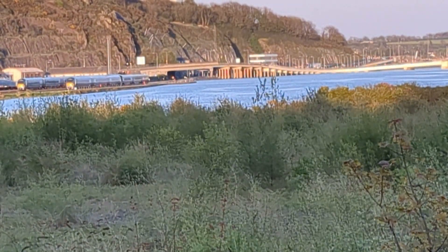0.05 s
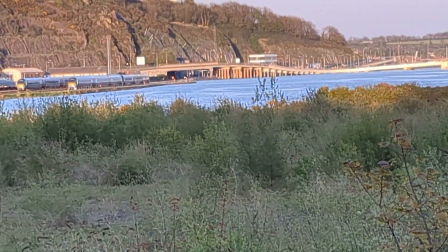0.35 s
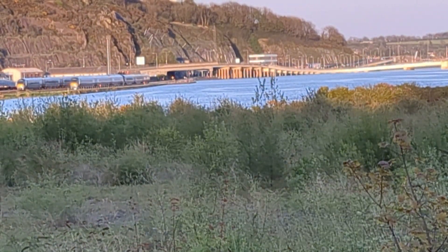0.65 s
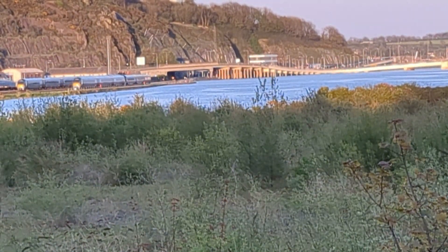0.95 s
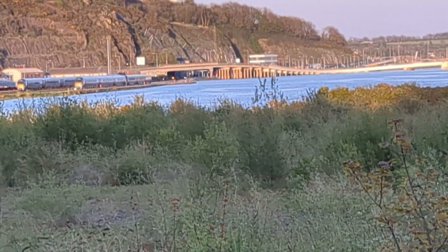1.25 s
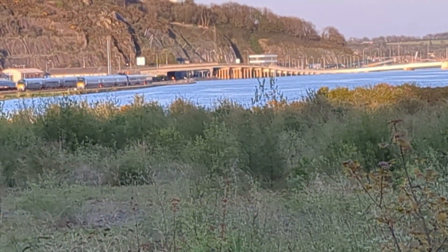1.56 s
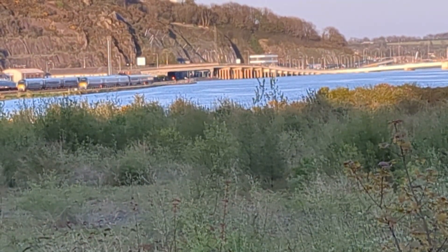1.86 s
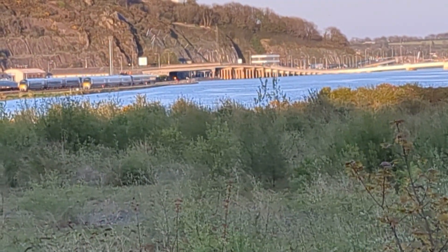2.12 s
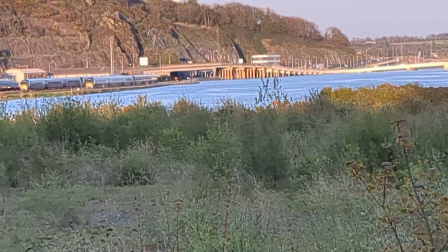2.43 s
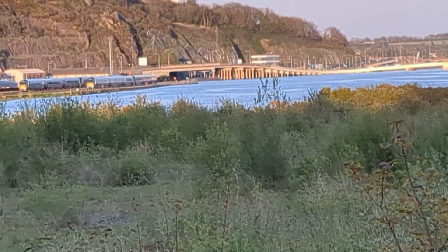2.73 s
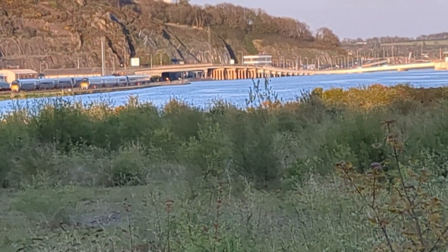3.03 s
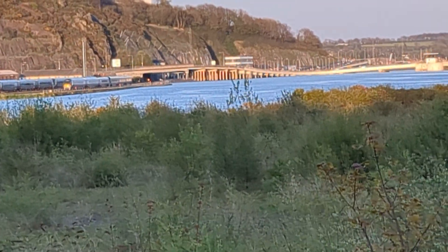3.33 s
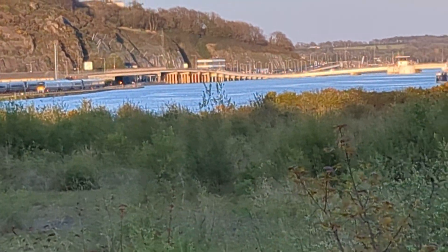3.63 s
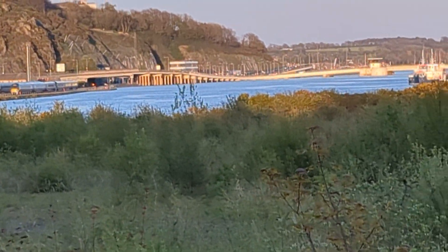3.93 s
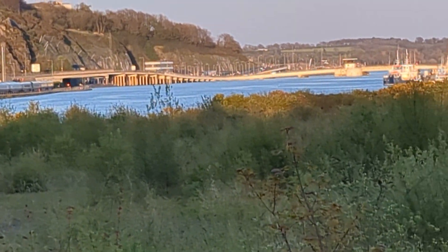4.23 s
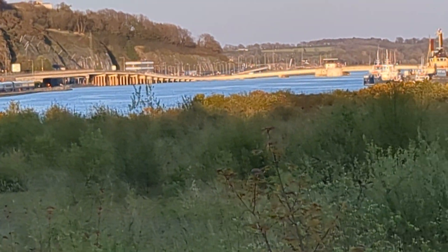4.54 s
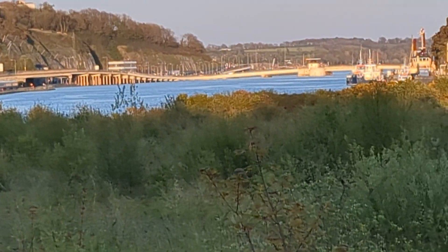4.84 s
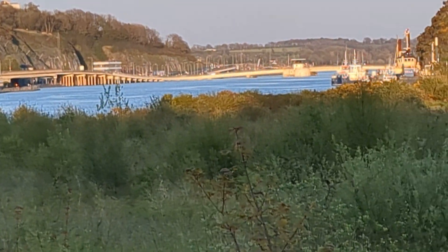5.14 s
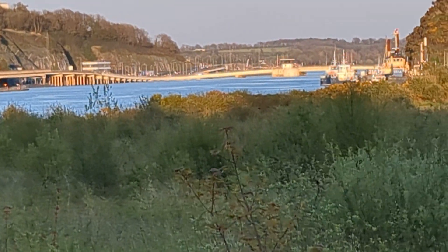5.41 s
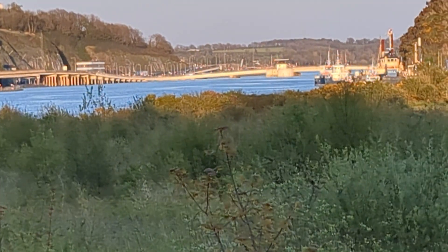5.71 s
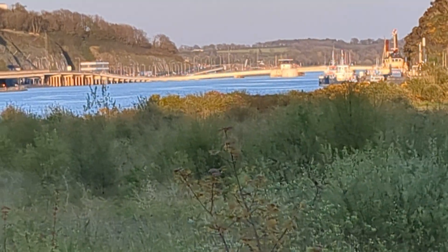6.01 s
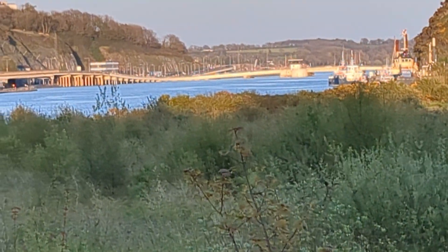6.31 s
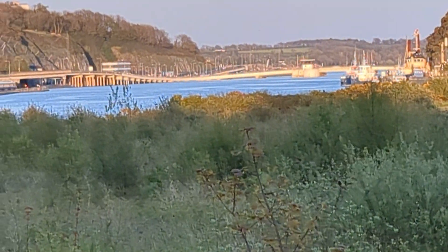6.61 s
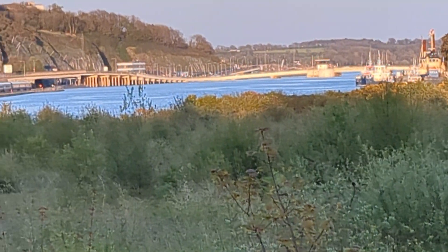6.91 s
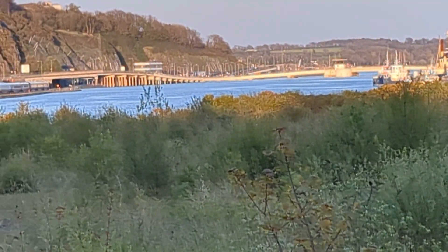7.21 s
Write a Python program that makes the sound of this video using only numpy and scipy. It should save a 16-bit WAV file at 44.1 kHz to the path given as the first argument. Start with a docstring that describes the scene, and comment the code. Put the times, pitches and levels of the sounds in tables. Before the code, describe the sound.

A small songbird sings a quick falling song, then rising whistles repeat over light wind on the microphone and distant traffic.

```python
"""A finch sings a falling song of lisps, a rattle, a snap and a flourish in scrub above a river.
A warbler repeats an upslurred whistle and small birds twitter far off; each voice is a nearly pure
oscillation of the syrinx, scattered by twigs and bushes. Turbulent wind presses on two microphone
ports, mostly the left one, while traffic hums across the water over a faint hiss.
A noise suppressor holds the treble down and raises it while a high note is loud."""
import sys
import numpy as np
from scipy import signal
from scipy.fft import rfft, irfft
from scipy.io import wavfile
from scipy.ndimage import uniform_filter1d

SR = 44100
rng = np.random.default_rng(int(sys.argv[2]) if len(sys.argv) > 2 else 0)


def file_out(sig):
    """Save sig as 16-bit WAV at sys.argv[1]."""
    # one column per channel
    cols = np.atleast_2d(sig).T
    # limit, then scale
    lim = np.clip(cols, -1, 1)
    pcm = np.round(lim * 32767).astype(np.int16)
    wavfile.write(sys.argv[1], SR, pcm)


N = 324576
TIME = np.arange(N) / SR

# All table levels are relative; a lean is the level at the left port minus that at the right.
# Notes of each finch syllable: t/s from its beat, length/s, start f/Hz, end f/Hz, arch/Hz,
# level/dB, buzz depth/Hz
LISP_NOTES = [(-.064, .026, 4180, 4020, 0, -9, 0), (-.051, .017, 2820, 2920, -30, -20, 0),
              (-.04, .021, 2850, 5000, 0, -11, 0), (-.013, .023, 3550, 2500, 600, -3, 0)]
RATTLE_NOTES = [(-.018, 0.014, 2750, 2800, 81, -15, 3), (-.003, 0.0344, 2996, 3532, 333, 3, 365),
                (.036, .026, 2218, 1854, 568, -5.5, 8), (.062, 0.033, 2440, 2420, 200, -27, -1)]
SNAP_NOTES = [(-.014, .027, 3540, 3050, 250, 4.5, 347), (.006, 0.025, 3010, 840, 0, 2, 249)]
FLOURISH_NOTES = [(-.061, 0.024, 3900, 5450, -350, -10, 200), (-.041, .03, 3030, 3330, 97, -9.5, 250),
                  (-.03, .085, 3212, 2800, 560, -3.5, 424), (.035, .095, 2840, 1924, -100, -15, 330)]
# Beats on which each syllable is sung: t/s, level/dB
LISP_BEATS = [(0.111, -57.5), (0.237, -56.5), (.357, -56.5), (.474, -51), (.593, -48.5), (0.705, -47.5),
              (.826, -49)]
RATTLE_BEATS = [(0.892, -61), (1.003, -58.5), (1.115, -58), (1.227, -59), (1.334, -59), (1.443, -56.5),
                (1.558, -58)]
SNAP_BEATS = [(1.681, -64)]
FLOURISH_BEATS = [(1.825, -52)]
# Warbler whistles: t/s, length/s, level/dB, start f/Hz, end f/Hz, shoulder height/Hz
WARBLER_WHISTLES = [(.545, .13, -58.5, 2900, 4450, 120), (2.15, .11, -83, 2850, 4050, 50),
                    (2.56, .142, -62, 2750, 4850, 0), (3.14, .11, -84, 2950, 3950, 50),
                    (3.405, .147, -61, 2800, 4350, 300), (4.29, .162, -59, 2700, 4350, 280),
                    (5.26, .155, -53, 2650, 4750, 0), (6.05, .11, -81, 2900, 3950, 50),
                    (6.2, .157, -58, 2780, 4300, 130), (7.18, .155, -53, 2700, 4850, 0)]
# Envelope of a whistle: fraction of its length, level/dB
WHISTLE_ENVELOPE = [(0, -34), (.35, -20), (.7, -5), (.87, -3.5), (1, -13)]
# Notes of distant birds: t/s, length/s, start f/Hz, end f/Hz, level/dB
FAR_NOTES = [(.443, .024, 4620, 4800, -65), (.558, .022, 4700, 4700, -61), (2.85, .09, 5150, 4700, -82),
             (2.925, .085, 4620, 4600, -83), (1.82, .07, 11400, 11200, -86), (1.84, .06, 7700, 7400, -86),
             (2.08, .38, 7300, 6000, -96), (2.68, .15, 6900, 5700, -92), (5.7, .04, 4400, 6000, -77),
             (5.853, .03, 4850, 5450, -79), (5.89, .022, 3600, 4200, -79), (6.03, .03, 4750, 5300, -80)]
# Eddies striking the ports: t/s, level/dB, half-length/s, roll-off f/Hz, lean/dB
PORT_EDDIES = [(0.004, -35.5, .008, 174, 23), (0.255, -46, 0.0029, 500, 31), (.381, -52.5, 0.0032, 158, 8),
               (0.407, -46.5, 0.0044, 217, 28), (.586, -39.5, 0.005, 210, 38), (.683, -38, 0.0074, 205, 16),
               (0.704, -31.5, 0.0092, 365, 39), (0.78, -44.5, 0.006, 127, 15),
               (0.874, -39.5, 0.014, 196, 23), (1.04, -36.5, 0.012, 370, 28), (1.064, -29, 0.0052, 335, 45),
               (1.211, -43.5, 0.005, 500, 34), (1.248, -42, .018, 470, 30), (1.456, -41, 0.013, 209, 18),
               (1.489, -44.5, 0.0065, 260, 29), (1.521, -45, 0.01, 310, 32), (1.571, -46, 0.016, 254, 24),
               (1.673, -44.5, .009, 250, -14), (1.722, -45, 0.037, 193, -5),
               (1.998, -46.5, 0.023, 217, -5.5), (2.042, -44, 0.039, 224, -4.5),
               (2.478, -45.5, 0.034, 245, 9.5), (2.591, -44.5, 0.0085, 131, 27),
               (2.68, -51.5, 0.0035, 433, 30), (3.163, -53.5, 0.0031, 101, 35),
               (3.544, -56.5, 0.0037, 91, -2.5), (3.751, -57.5, .03, 90, 2.5),
               (3.879, -52, 0.0049, 145, 16), (3.975, -49.5, .001, 417, 36),
               (4.598, -51.5, 0.0089, 103, 15), (4.688, -52, 0.00076, 600, 40),
               (4.788, -44, 0.0087, 229, 30), (4.924, -45, 0.019, 237, 21), (5.086, -58, 0.0027, 105, -4),
               (5.423, -47.5, 0.026, 165, 20), (5.686, -53, 0.0042, 132, 24), (6.104, -54, 0.0052, 207, 18),
               (6.538, -56.5, 0.0022, 120, 23)]
# Slow course of the breeze: t/s, level/dB, lean/dB before scaling
BREEZE_LEVELS = [(0.04, -53, 17), (0.22, -60, 16), (0.79, -51, 16), (0.96, -67, -15.5), (1.14, -49, 28.5),
                 (1.4, -50, 12), (1.61, -52.5, 13), (1.67, -71, -6), (1.91, -48.5, 14.5), (2.12, -63, -6),
                 (2.42, -58, 14), (3.48, -67.5, -1), (4.95, -60.5, 18), (5.11, -66, 0), (5.4, -65.5, 10),
                 (6.56, -59, 14), (7.32, -67.5, 10), (7.36, -55.5, -17)]
# Slow course of the traffic: t/s, low-band level/dB, high-band level/dB
TRAFFIC_LEVELS = [(0.0, -64.5, -81), (0.59, -66, -68), (1.74, -65, -79), (2.97, -68.5, -80),
                  (3.34, -70.5, -77), (3.85, -66.5, -81), (4.26, -69.5, -77.5), (4.59, -67, -78.5),
                  (4.86, -68.5, -81), (5.2, -68, -80.5), (5.47, -67, -73), (6.01, -67, -79),
                  (6.46, -64.5, -76.5), (6.64, -67.5, -81), (6.87, -66.5, -79.5), (7.07, -67.5, -77.5),
                  (7.36, -60.5, -80)]
# Spectral densities of the three noises: f/Hz, level/dB
BREEZE_SPECTRUM = [(15, -29), (25, -24), (33, -8), (46, -7.5), (65, 2), (100, -5), (140, -6.5), (220, -24),
                   (450, -36), (800, -40), (1500, -106)]
TRAFFIC_SPECTRUM = [(200, -20.5), (400, -18.5), (560, -10.5), (750, -2), (1000, -1.5), (1350, -2),
                    (1700, -4.5), (1950, -8), (2200, -16), (2600, -26), (3500, -34)]
HISS_SPECTRUM = [(1500, -4), (2600, -2), (3300, 0), (4100, 1), (4700, -3), (6500, -3), (7600, -7),
                 (12000, -8), (13500, -12), (16000, -13)]


def finch(lean_db=-.5):
    """Superposition of quick notes forms four kinds of syllable; each note varies in level."""
    song = np.zeros((2, N))
    for notes, beats in ((LISP_NOTES, LISP_BEATS), (RATTLE_NOTES, RATTLE_BEATS),
                         (SNAP_NOTES, SNAP_BEATS), (FLOURISH_NOTES, FLOURISH_BEATS)):
        for beat, db in beats:
            for delay, *shape in notes:
                add(song, beat + delay, amp(db + rng.uniform(-1.5, 4.5)) * finch_note(*shape))
    return scrub(song * sides(lean_db), lag_ms=.36, near_db=-7, near_t60=.1, far_db=-10.5, far_t60=.8)


def finch_note(length, from_hz, to_hz, arch_hz, db, depth_hz, buzz_hz=218, pitch_spread=.012):
    """Frequency and amplitude modulation at one rate give an arched glide sidebands, heard as buzz."""
    t = np.arange(0, length, 1 / SR)
    progress = t / length
    flutter = 2 * np.pi * buzz_hz * t * rng.uniform(.93, 1.03)
    throb = 1 + np.clip(.27 * depth_hz / 400, 0, 1) * np.cos(flutter)
    glide = from_hz + (to_hz - from_hz) * progress + arch_hz * (1 - (2 * progress - 1) ** 2)
    hz = glide * (1 + pitch_spread * rng.standard_normal()) + depth_hz * np.sin(flutter)
    envelope = abs(np.sin(np.pi * progress)) ** 1.4
    return throb * envelope * syrinx(hz, db)


def syrinx(hz, db, octave_db=-48):
    """A nearly sinusoidal oscillator: phase is the integral of frequency, with a weak second harmonic."""
    phase = 2 * np.pi * np.cumsum(hz) / SR
    tone = np.sin(phase) + amp(octave_db) * np.sin(2 * phase)
    return np.sqrt(2) * amp(db) * tone * signal.windows.tukey(len(hz), .06)


def warbler(quaver=.01, shoulder_db_per_hz=.0288, lean_db=5.5):
    """A frequency sweep swells as it climbs, lingers on a shoulder, then flicks upward and stops."""
    song, waver = np.zeros((2, N)), wander(200)
    for start, length, db, from_hz, to_hz, shoulder_hz in WARBLER_WHISTLES:
        progress = np.linspace(0, 1, round(length * SR))
        rise = .6 * progress + .4 * progress ** 3.7  # steady climb plus late flick
        shoulder = shoulder_hz * np.exp(-((progress - .403) / .2) ** 2)
        glide = from_hz + (to_hz - from_hz) * rise + shoulder
        jitter = quaver * np.roll(waver, -round(start * SR))[:len(progress)]
        swell_db = db + curves(WHISTLE_ENVELOPE, progress)[0] + shoulder_db_per_hz * shoulder
        add(song, start, sides(lean_db) * syrinx(glide * (1 + jitter), swell_db))
    return scrub(song, lag_ms=-.24, near_db=-1, near_t60=.068, far_db=-6.5, far_t60=.42)


def far_birds():
    """Faint linear frequency sweeps are blurred by scattering in the bushes."""
    song = np.zeros((2, N))
    for start, length, from_hz, to_hz, db in FAR_NOTES:
        progress = np.linspace(0, 1, round(length * SR))
        add(song, start, np.sin(np.pi * progress) * syrinx(from_hz + (to_hz - from_hz) * progress, db))
    return scrub(song, lag_ms=-.5, near_db=-3, near_t60=.1, far_db=-12, far_t60=.5)


def scrub(song, lag_ms, near_db, near_t60, far_db, far_t60):
    """Scattering adds exponentially decaying echoes: brief from twigs, longer from farther bushes."""
    t = np.arange(SR) / SR
    near, far = rng.standard_normal((2, 2, SR)) * (rng.random((2, 2, SR)) < .08) * (t > .002)
    response = 0
    for echoes, db, t60 in ((near, near_db, near_t60), (far, far_db, far_t60)):
        tail = echoes * amp(-60 * t / t60)
        response = response + amp(db) * tail / np.linalg.norm(tail, axis=1, keepdims=True)
    direct = np.array([np.roll(song[0], round(lag_ms * SR / 1000)), song[1]])  # one port hears it first
    return direct + signal.fftconvolve(song, response, axes=1)[:, :N]


def buffets(turbulent_s=.0035, span_s=.013, gain_db=6.5):
    """An eddy is a pressure impulse within a burst of turbulence; in the shortest the impulse dominates."""
    wind, t = np.zeros((2, N)), np.arange(-4096, 4096) / SR
    for centre, db, half_length, edge_hz, lean_db in PORT_EDDIES:
        burst = rng.standard_normal((2, len(t))) * np.exp(-(t / half_length) ** 2)
        burst /= np.linalg.norm(burst, axis=1, keepdims=True)
        pressure = (t == 0) + half_length / turbulent_s * burst
        for corner_hz, kind in ((edge_hz, "low"), (2.02 * edge_hz, "low"), (.26 * edge_hz, "high")):
            pressure = signal.sosfilt(signal.butter(2, corner_hz, kind, fs=SR, output="sos"), pressure)
        pressure /= np.sqrt(np.sum(pressure ** 2, axis=1, keepdims=True) / (span_s * SR))
        add(wind, centre + t[0], amp(db + gain_db) * sides(lean_db) * pressure / np.sqrt(2))
    return wind


def breeze(lumpy_db=2, puffs_per_s=14, puff_db=-7, puff_band_hz=(55, 159.5)):
    """Turbulent pressure is local, so its low rumble and soft puffs are uncorrelated at the two ports."""
    lumps = unit(amp(lumpy_db * np.array([wander(23) for port in range(2)])))
    rumble = lumps * noise(BREEZE_SPECTRUM)
    impulses = rng.uniform(-1, 1, (2, N)) * (rng.random((2, N)) < puffs_per_s / SR)
    puffs = signal.sosfilt(signal.butter(2, puff_band_hz, "band", fs=SR, output="sos"), impulses)
    return wind_strength() * (rumble + amp(puff_db) * unit(puffs))


def wind_strength(breeze_gain_db=4, lean_scale=.87, gust_db=-7, gust_s=.048):
    """Incoherent powers add: the slow breeze plus a brief gust around every eddy."""
    db, lean_db = curves(BREEZE_LEVELS, TIME)
    power = (amp(db + breeze_gain_db) * sides(lean_scale * lean_db)) ** 2
    for centre, eddy_db, _, edge_hz, eddy_lean_db in PORT_EDDIES:
        gust = amp(eddy_db + gust_db) * (200 / edge_hz) ** 1.56  # duller eddies bring more wind
        power += (gust * sides(eddy_lean_db)) ** 2 * np.exp(-((TIME - centre) / gust_s) ** 2)
    return np.sqrt(power)


def traffic(coherent_share=.32, lag_ms=.56, split_hz=1500, gain_db=3, lean_db=-.9):
    """A diffuse field and a direct wave reaching the left port first form a partly coherent roar."""
    low_db, high_db = curves(TRAFFIC_LEVELS, TIME)
    left, right, road = noise(TRAFFIC_SPECTRUM, channels=3)
    direct = np.array([road, np.roll(road, round(lag_ms * SR / 1000))])
    roar = np.sqrt(1 - coherent_share) * np.array([left, right]) + np.sqrt(coherent_share) * direct
    low = signal.sosfiltfilt(signal.butter(4, split_hz, fs=SR, output="sos"), roar)
    return amp(gain_db) * sides(lean_db) * (amp(low_db) * unit(low) + amp(high_db) * unit(roar - low))


def noise(spectrum, channels=2):
    """Spectral shaping of white noise gives independent channels of one colour."""
    hz, db = np.transpose(spectrum)
    gain = amp(np.interp(np.log(np.fft.rfftfreq(N, 1 / SR) + 1), np.log(hz + 1), db))
    return unit(irfft(rfft(rng.standard_normal((channels, N))) * gain, N))


def wander(rate_hz):
    """Low-pass filtering of noise gives a smooth random fluctuation."""
    gain = np.exp(-(np.fft.rfftfreq(N, 1 / SR) / rate_hz) ** 2)
    return unit(irfft(rfft(rng.standard_normal(N)) * gain, N))


def amp(db):
    """Amplitude grows tenfold for every 20 dB."""
    return 10 ** (np.asarray(db) / 20)


def unit(x):
    """Normalisation to an rms of 1."""
    return x / np.sqrt(np.mean(x ** 2) + 1e-20)


def sides(lean_db):
    """A level difference between left and right at constant total power."""
    gains = amp(np.array([lean_db, -lean_db]).reshape(2, -1) / 2)
    return gains / np.sqrt(np.mean(gains ** 2, axis=0))


def curves(rows, t):
    """Linear interpolation of a table's columns in time."""
    times, *columns = np.transpose(rows)
    return [np.interp(t, np.sort(times), column) for column in columns]


def add(mix, start_s, sound):
    """Superposition of a sound on the mix from a given time."""
    start = round(start_s * SR)
    sound = sound[..., max(-start, 0):]
    part = mix[:, max(start, 0):][:, :sound.shape[-1]]
    part += sound[..., :part.shape[1]]


def scene(hiss_db=-85.3):
    """The pressures of birds, traffic, wind and a faint hiss add linearly."""
    birds = finch() + warbler() + far_birds()
    return birds + traffic() + breeze() + buffets() + amp(hiss_db) * noise(HISS_SPECTRUM)


def record(dry, treble_hz=5200, threshold_db=-80, slope=.6, rest_db=-7, limit_hz=15750):
    """Dynamic expansion: treble gain rises with the level of high notes; a low-pass limits the band."""
    song = signal.sosfiltfilt(signal.butter(3, [3850, 6000], "band", fs=SR, output="sos"), dry)
    song_power = uniform_filter1d(np.mean(song ** 2, axis=0), size=1800)
    song_db = 10 * np.log10(abs(song_power) + 1e-14)
    treble = signal.sosfiltfilt(signal.butter(8, treble_hz, "high", fs=SR, output="sos"), dry)
    treble_gain = amp(rest_db + slope * np.maximum(song_db - threshold_db, 0))
    expanded = dry + treble * (treble_gain - 1)
    low_pass = signal.firwin(511, limit_hz, window=("kaiser", 9), fs=SR)
    return signal.oaconvolve(expanded, low_pass[None], "same")


dry = scene()
out = record(dry)
file_out(out)
```